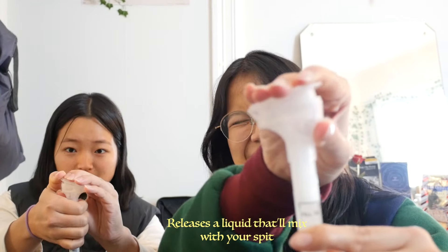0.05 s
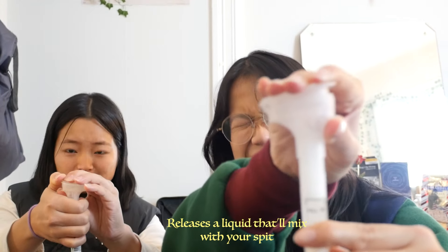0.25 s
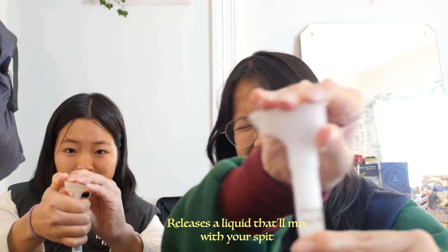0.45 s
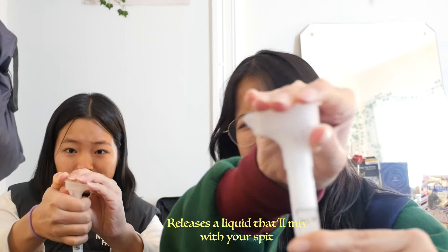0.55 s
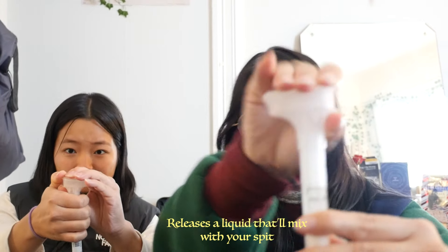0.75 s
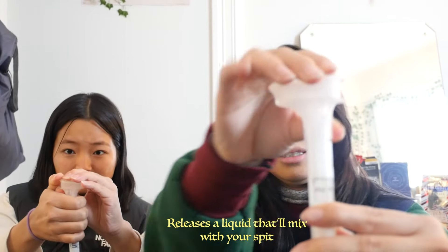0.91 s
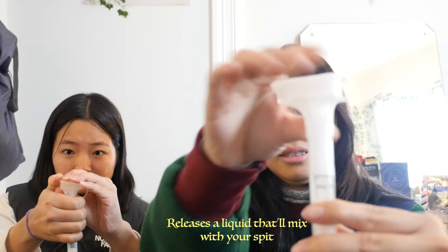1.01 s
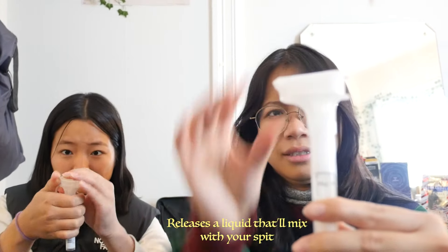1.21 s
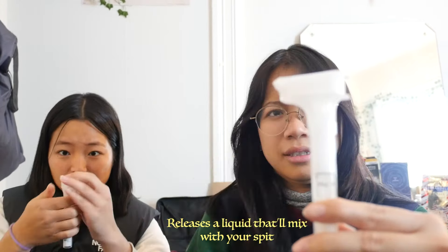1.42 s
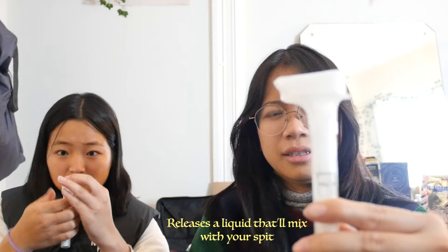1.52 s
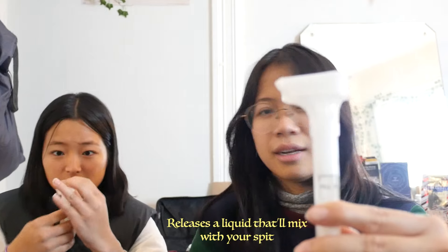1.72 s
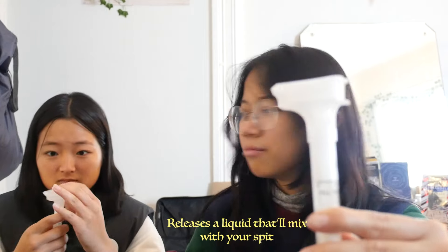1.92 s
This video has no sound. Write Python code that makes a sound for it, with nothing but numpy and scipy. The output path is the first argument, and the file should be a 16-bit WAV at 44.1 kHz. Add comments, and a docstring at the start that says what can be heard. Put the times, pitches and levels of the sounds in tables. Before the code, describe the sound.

Close microphone in a hard-walled indoor room: soft hiss and a faint throbbing hum, two loud crisp plastic snaps early on with short reverberation, then near silence, slight hand rustling and small final ticks.

```python
"""Two plastic tube lids are pressed shut by hand, close by in a hard-walled room.
From the start, soft hiss lies over a faint low rumble and hum that throb together.
At 0.21 s one lid snaps, at 0.37 s the other, nearer one: each is a few cracks within about 3 ms, ringing
plastic and a low pop. The walls answer about 11 ms later, as noise that dies away.
From 1.2 s come faint rustles of lumpy noise and a soft pop; at 1.84 s small ticks of handling."""
import sys
import numpy as np
from scipy import signal
from scipy.fft import rfft, irfft
from scipy.io import wavfile
from scipy.ndimage import uniform_filter1d

SR = 44100
rng = np.random.default_rng(int(sys.argv[2]) if len(sys.argv) > 2 else 0)


def rack_gain(trim_db):
    """Turn a fader trim in dB into the linear factor to multiply a signal by."""
    fader = np.asarray(trim_db, float)
    return 10 ** (fader / 20)


def transcribe(signal):
    """Save signal, clipped to [-1, 1], as a 16-bit WAV file at the path in sys.argv[1]."""
    frames = np.atleast_2d(signal).T
    limited = np.clip(frames, -1, 1)
    pcm = np.round(limited * 32767).astype(np.int16)
    wavfile.write(sys.argv[1], SR, pcm)


N = 85995


def evened(x):
    """Scales a sound to an rms of 1."""
    return x / np.sqrt(np.mean(x ** 2) + 1e-20)


def read(points, hz):
    """Reads a table between its points, along a logarithmic pitch scale."""
    f, value = np.transpose(points)
    return np.interp(np.log(hz + 1), np.log(f + 1), value)


def add(mix, start_s, sound):
    """Adds a sound at its start time, cutting what runs past the end."""
    part = mix[:, round(start_s * SR):][:, :sound.shape[-1]]
    part += sound[..., :part.shape[1]]


def noise(length, colour, likeness):
    """Two channels of coloured noise; likeness 1 is the same left and right, 0 unrelated, -1 opposite."""
    hz = np.fft.rfftfreq(length, 1 / SR)
    a, b = rfft(rng.standard_normal((2, length)))
    same = np.clip(read(likeness, hz), -1, 1)
    right = same * a + np.sqrt(1 - same ** 2) * b
    pair = np.array([a, right]) * rack_gain(read(colour, hz))
    return evened(irfft(pair, length))


# How alike left and right are in the hiss and the rumble: pitch_hz, likeness
BACKGROUND_LIKENESS = [(60, 0.82), (180, 0.83), (550, 0.04), (1650, -0.4), (4970, 0.05), (15000, 0.79)]
# Colour of the hiss, as relative level per Hz: pitch_hz, level_db
HISS_COLOUR = [(20, -3.5), (45, -6), (80, -7.5), (120, -2.5), (200, -5), (400, -3), (600, -4.5), (1200, -4),
               (2400, -7.5), (5000, -11.5), (7800, -16), (10200, -14), (13000, -20), (16000, -27)]
# Slow rise and fall of the hiss around its level: time_s, change_db
HISS_LEVEL_CHANGES = [(0, -2.5), (.2, -2), (.75, -5.5), (1.0, -5.5), (1.2, -2), (1.3, -1.56), (1.55, -1.04),
                      (1.8, 0.5), (1.95, 4)]
HISS_DB = -61.5


def hiss():
    """Steady coloured noise whose level sinks and swells slowly."""
    t = np.arange(N) / SR
    level_db = HISS_DB + np.interp(t, *np.transpose(HISS_LEVEL_CHANGES))
    return rack_gain(level_db) * noise(N + 1, HISS_COLOUR, BACKGROUND_LIKENESS)[:, :N]


THROB_HZ, THROB_PEAK_S = 23.1, 0.889  # one of the peaks falls at this time


def throb():
    """A slow cosine between -1 and 1 that sways the rumble and the hum together."""
    t = np.arange(N) / SR
    return np.cos(2 * np.pi * THROB_HZ * (t - THROB_PEAK_S))


# Colour of the rumble, as relative level per Hz: pitch_hz, level_db
RUMBLE_COLOUR = [(30, -19.5), (70, -18), (120, -2), (170, -2), (250, -3.5), (400, -6.5), (700, -9),
                 (1500, -22), (3000, -49.5)]
RUMBLE_DB, RUMBLE_SWING_DB = -70.5, 13  # overall rms; swing from trough to peak


def rumble():
    """Low noise that grows louder and softer with the throb."""
    low_noise = noise(N + 1, RUMBLE_COLOUR, BACKGROUND_LIKENESS)[:, :N]
    return rack_gain(RUMBLE_DB) * evened(rack_gain(RUMBLE_SWING_DB * throb() / 2) * low_noise)


# Steady tones of the hum, with rms level before the throb: pitch_hz, level_db
HUM_TONES = [(120, -81), (167, -79.5), (240, -79), (360, -87), (480, -85)]
HUM_THROB = 0.46  # share by which the throb raises and lowers the hum


def hum():
    """A few steady sine tones, the same in both channels, swayed by the throb."""
    t = np.arange(N) / SR
    tones = np.zeros(N)
    for hz, db in HUM_TONES:
        # sqrt(2) turns an rms level into a peak height
        tones += rack_gain(db) * np.sqrt(2) * np.sin(2 * np.pi * (hz * t + rng.random()))
    return tones * (1 + HUM_THROB * throb())


# Cracks of the catches slipping home, and later small ticks. The pan raises the left
# channel and lowers the right by the same amount: start_s, level_db, pitch_hz, pan_left_db
CATCH_CRACKS = [(0.2077, -29, 5500, 0), (0.2087, -5, 4970, 3.5), (.2086, -6, 9600, 2),
                (0.2077, -17, 12500, 1), (.2095, -12.5, 6170, 5), (0.2102, -7.5, 4250, 5),
                (.2110, -13.5, 2300, 0.5), (0.369, -35, 4960, 0.5), (.3690, -17, 9640, -0.5),
                (0.3702, -3.5, 4510, -4.5), (0.3713, -5, 8600, 0.5), (.3714, 1, 5600, 1.5),
                (.3718, 4, 9800, 2.5), (0.3723, -4, 4700, -4), (1.8392, -64, 4000, 2.5),
                (1.852, -40.5, 4600, 6), (1.8534, -39.5, 9660, 1), (1.8555, -46, 6000, -3),
                (1.8580, -48, 2600, 2), (1.8680, -50, 10580, 0)]
CRACK_CYCLES = 3.5  # cycles of ringing until it is 20 dB down
GRIT_DB, GRIT_S = -4.5, 0.0006  # noisy edge: level against the ring, fade time


def cracks():
    """Each catch gives a very short ring with a gritty burst of noise on its front edge."""
    t, sounds = np.arange(8192) / SR, []
    for start_s, db, hz, pan_db in CATCH_CRACKS:
        ring = np.sin(2 * np.pi * hz * t) * 10 ** (-t * hz / CRACK_CYCLES)
        edge = rng.standard_normal((2, 400))
        mixed_edge = edge[0] + 0.54 * edge  # partly shared by the two channels
        grit = rack_gain(GRIT_DB) * mixed_edge * np.exp(-t[:400] / GRIT_S)
        crack = ring + np.pad(grit, ((0, 0), (0, len(t) - 400)))
        sounds.append((start_s, rack_gain(db + np.array([[pan_db], [-pan_db]])) * crack))
    return sounds


SAG_S = 0.0009  # time constant of the falling pitch


def fading_tones(table, sag):
    """Decaying sines, alike left and right, whose pitch falls by the share sag."""
    t, sounds = np.arange(8192) / SR, []
    for start_s, db, hz, t60_s in table:
        pitch_hz = hz * (1 - sag + sag * np.exp(-t / SAG_S))
        fade = rack_gain(-60 * t / t60_s)
        tone = -rack_gain(db) * fade * np.sin(2 * np.pi * np.cumsum(pitch_hz) / SR)
        sounds.append((start_s, np.array([tone, tone])))
    return sounds


# Longer rings of the tube and cap walls; t60 is the time to fade by 60 dB:
# start_s, level_db, pitch_hz, t60_s
WALL_RINGS = [(.2088, -21, 554, 0.034), (.2085, -17.5, 1330, 0.025), (.2095, -19.5, 2090, 0.019),
              (.3705, -14.5, 2056, .01), (0.3714, -17, 1380, 0.014), (.3722, -20, 8050, 0.021),
              (1.8410, -51, 2480, 0.025), (1.8510, -45, 2580, 0.026), (1.857, -49.5, 2650, .04)]


def rings():
    """The plastic walls ring on at a steady pitch."""
    return fading_tones(WALL_RINGS, 0)


# Low pops of air and tube body: start_s, level_db, start_pitch_hz, t60_s
AIR_POPS = [(0.2108, -18, 570, .026), (0.3722, -5.5, 619, 0.016), (1.5490, -50, 634, 0.071),
            (1.8415, -42.5, 900, .012)]
POP_SAG = 0.62  # share by which the pitch falls


def pops():
    """Air and tube body sound a low tone that drops quickly in pitch and dies away."""
    return fading_tones(AIR_POPS, POP_SAG)


LOW_CUT_HZ, HIGH_CUT_HZ = 125, 12500


def lid_sounds():
    """Every crack, ring and pop, thinned below 125 Hz and dulled above 12.5 kHz."""
    low_cut = signal.butter(3, LOW_CUT_HZ, "high", fs=SR, output="sos")
    high_cut = signal.butter(3, HIGH_CUT_HZ, fs=SR, output="sos")
    band_limits = np.vstack([low_cut, high_cut])
    return [(start_s, signal.sosfilt(band_limits, x)) for start_s, x in cracks() + rings() + pops()]


# Time for the room to fade by 60 dB: pitch_hz, t60_s
ROOM_FADE = [(100, 0.22), (250, 0.33), (700, .4), (2000, 0.4), (5000, 0.36), (9000, 0.32), (12000, 0.28),
             (15000, .25)]
# Colour of the room's answer, as relative level: pitch_hz, level_db
ROOM_TINT = [(100, 0), (250, -7.5), (600, -4.5), (1100, -0.5), (1400, 1.5), (2100, 2), (3000, -1.5),
             (4800, 1), (6500, 2), (7800, -3), (10000, 2), (12500, 0.5), (15500, 1)]
# How alike left and right are in the room and the rustles: pitch_hz, likeness
ROOM_LIKENESS = [(60, 0.9), (180, 1), (350, 0.97), (550, 1), (1650, 0.29), (4970, 0.38), (15000, 0.85)]
ROOM_DB = -4.5  # level of the whole answer for an echo pattern of unit energy in the left channel
WALL_S, WALL_SPREAD_S, WALL_DB = 0.0112, 0.0029, 4.48  # first wall: delay, spread, peak against the tail
BUILD_S, NEAR_DB = 0.0055, -7  # build-up time of the tail; scatter before the wall, against the tail


def room(x):
    """A little scatter, the first wall, then a dense tail dying band by band; a new path for each sound."""
    hz, t, z = signal.stft(noise(32768, ROOM_TINT, ROOM_LIKENESS), SR, nperseg=256)
    fading = z * rack_gain(-60 * t / read(ROOM_FADE, hz)[:, None])
    tail = signal.istft(fading, SR, nperseg=256)[1]
    late = np.arange(tail.shape[1]) / SR - WALL_S
    scatter = rack_gain(NEAR_DB) * (late > 0.002 - WALL_S)  # silent for the first 2 ms
    wall = rack_gain(WALL_DB) * np.exp(-abs(late) / WALL_SPREAD_S)
    build_up = 1 - np.exp(-abs(late) / BUILD_S)
    tail = tail * np.where(late < 0, scatter, build_up + wall)
    echoes = tail / np.linalg.norm(tail[0])
    return rack_gain(ROOM_DB) * signal.fftconvolve(x.mean(0)[None], echoes, axes=1)


# Soft rustles of hands and sleeves: start_s, length_s, level_db, centre_pitch_hz
HAND_RUSTLES = [(1.21, .08, -70, 1300), (1.401, 0.15, -74, 1680), (1.546, .12, -70.5, 1696),
                (1.84, .012, -53.5, 2450), (1.848, 0.017, -52.5, 4510), (1.858, 0.063, -64, 2934)]
BAND_STEP_OCTAVES, LUMPS_DB = 0.49, 3  # the band is 6 dB down one step from its centre; rms of the lumps


def rustles():
    """Hands and sleeves: noise around one pitch, uneven in level, under a soft swell."""
    out = np.zeros((2, N))
    for start_s, length_s, db, hz in HAND_RUSTLES:
        band = [(hz * 2 ** (k * BAND_STEP_OCTAVES), -6 * k * k) for k in range(-3, 4)]
        hush = noise(8192, band, ROOM_LIKENESS)
        lumps = evened(uniform_filter1d(rng.standard_normal(8192), 300))
        progress = np.minimum(np.arange(8192) / SR / length_s, 1)
        swell = np.sin(np.pi * np.sqrt(progress))  # peaks a quarter of the way through
        add(out, start_s, rack_gain(db + LUMPS_DB * lumps) * swell * hush)
    return out


NEAR_LID_S, FAR_ROOM_DB = (0.3, 1), 3  # span of the nearer lid; extra room level outside it


def scene():
    """Background and rustles, with each lid sound heard directly and through the room."""
    mix = hiss() + rumble() + hum() + rustles()
    for start_s, sound in lid_sounds():
        far = not NEAR_LID_S[0] < start_s < NEAR_LID_S[1]
        add(mix, start_s, sound)
        add(mix, start_s, rack_gain(FAR_ROOM_DB * far) * room(sound))
    return mix


def roll_off(x):
    """The treble ends steeply here."""
    return signal.sosfilt(signal.butter(12, 16380, fs=SR, output="sos"), x)


KNEE_DB, SLOPE, RECOVER_DB_PER_S = -13.5, 0.73, 130.5  # slope: dB turned down per dB over the knee


def record(dry):
    """A limiter turns loud moments down slightly late and recovers fast; peaks clip at full scale."""
    power = uniform_filter1d((dry ** 2).mean(0), 130, origin=64)  # looks back about 3 ms
    power_db = 10 * np.log10(abs(power) + 1e-12)
    fall = np.arange(N) * RECOVER_DB_PER_S / SR
    held_db = np.maximum.accumulate(power_db + fall) - fall  # rises at once, falls steadily
    over_db = np.maximum(held_db - KNEE_DB, 0)
    ducked = dry / rack_gain(SLOPE * uniform_filter1d(over_db, 130, origin=64))
    finished = np.clip(ducked, -1, 1)
    return roll_off(finished)


dry = scene()
out = record(dry)
transcribe(out)
```